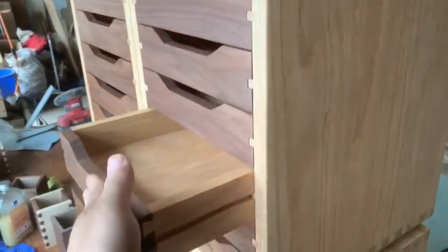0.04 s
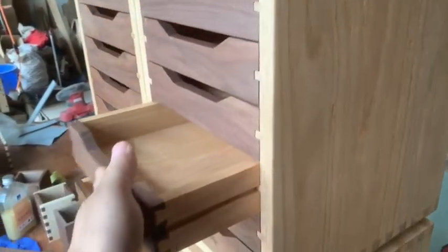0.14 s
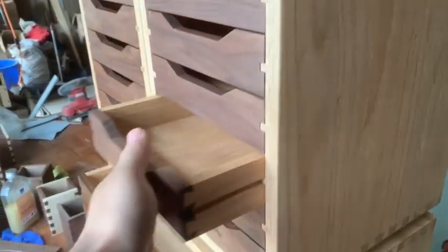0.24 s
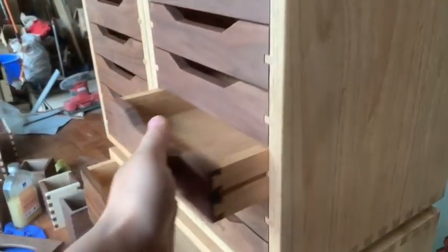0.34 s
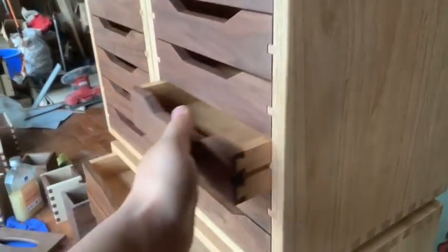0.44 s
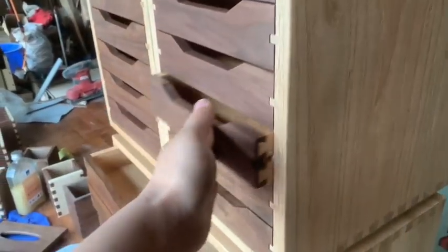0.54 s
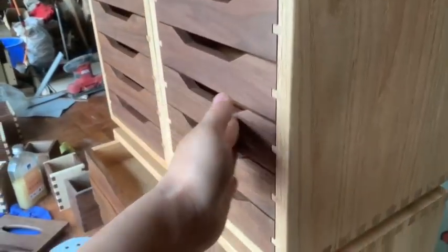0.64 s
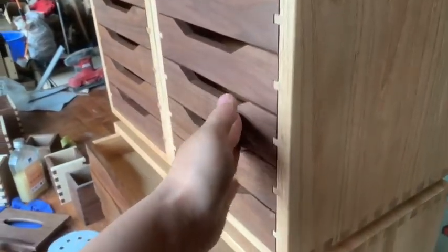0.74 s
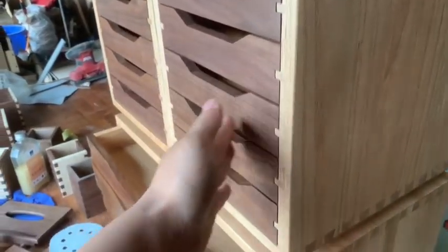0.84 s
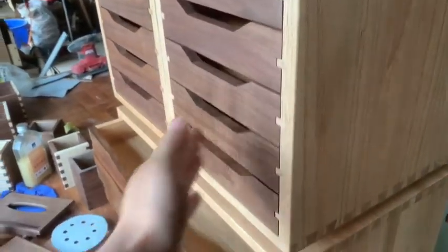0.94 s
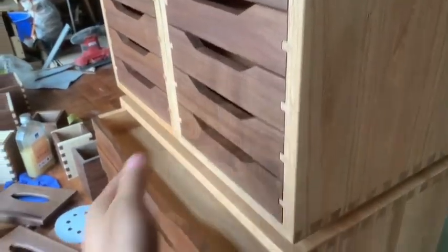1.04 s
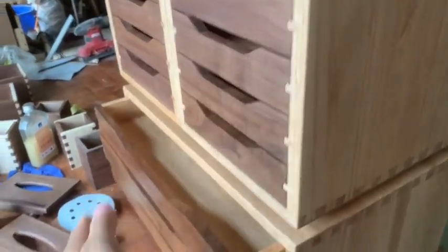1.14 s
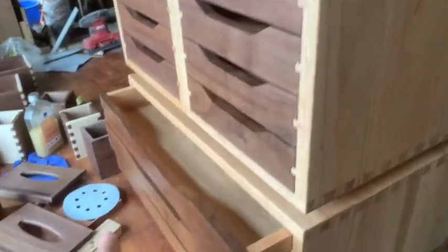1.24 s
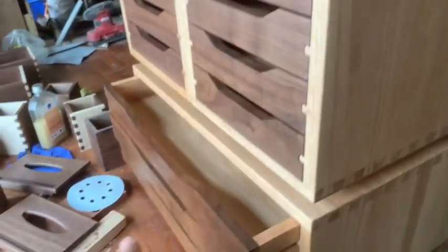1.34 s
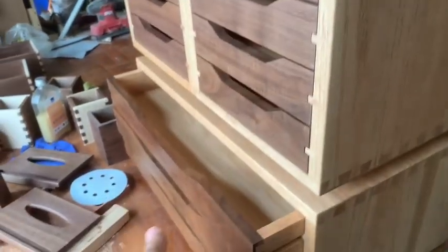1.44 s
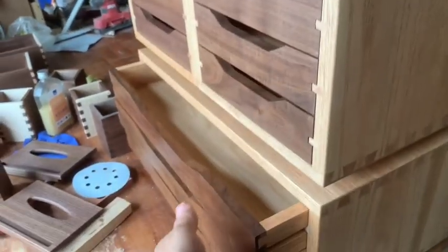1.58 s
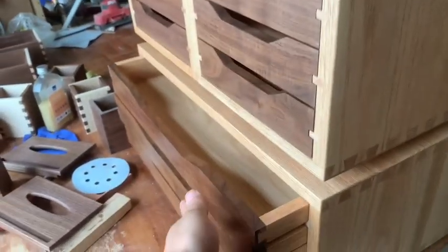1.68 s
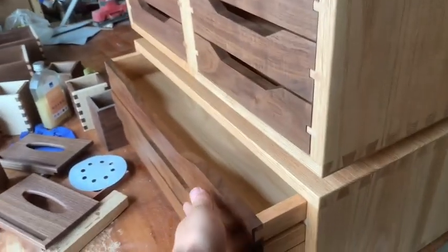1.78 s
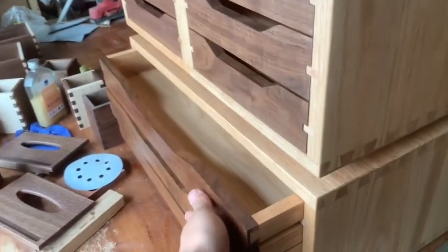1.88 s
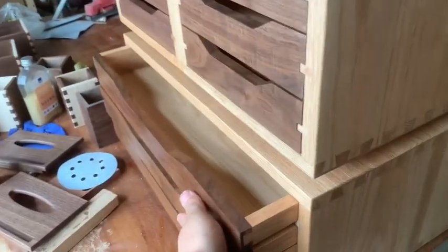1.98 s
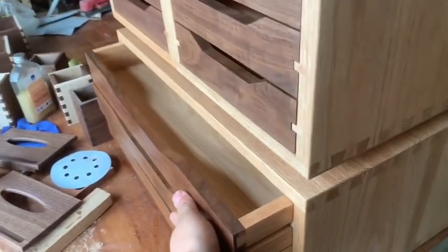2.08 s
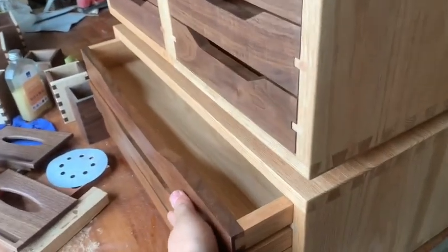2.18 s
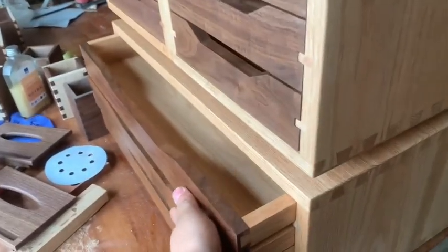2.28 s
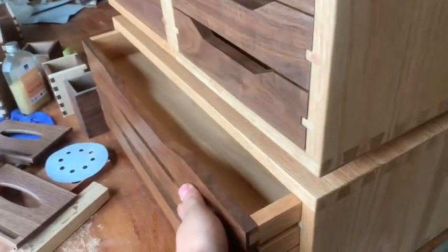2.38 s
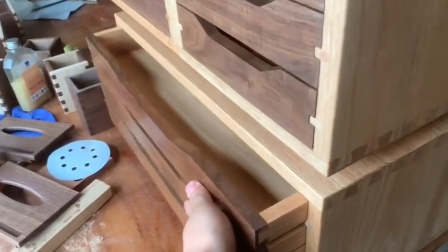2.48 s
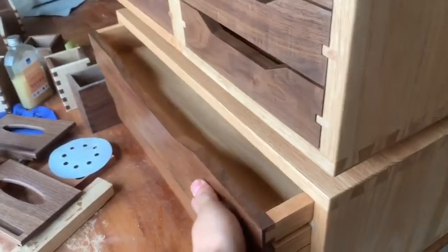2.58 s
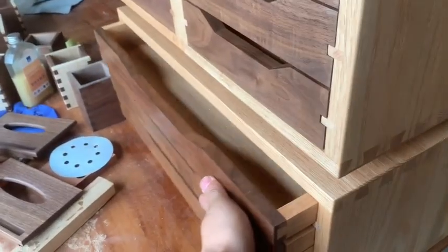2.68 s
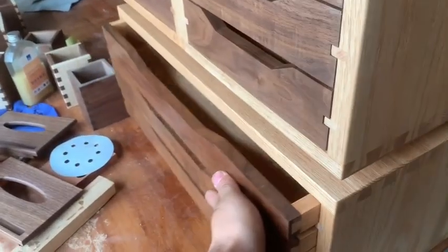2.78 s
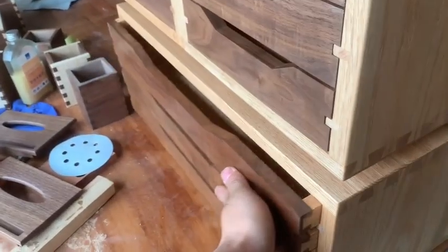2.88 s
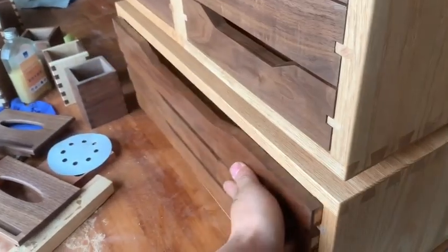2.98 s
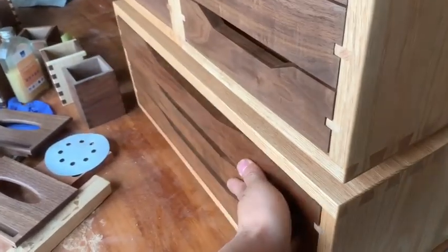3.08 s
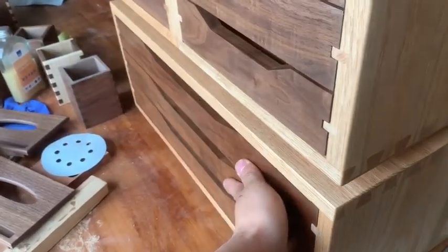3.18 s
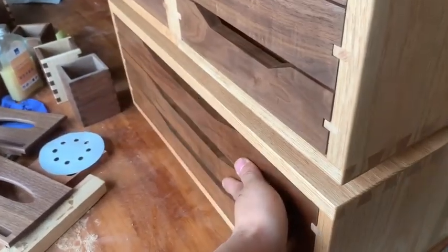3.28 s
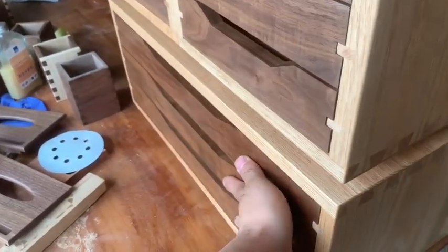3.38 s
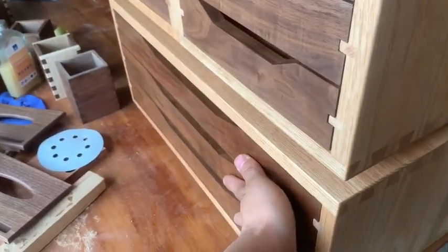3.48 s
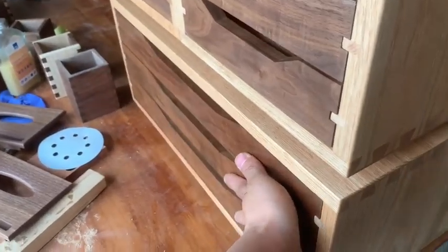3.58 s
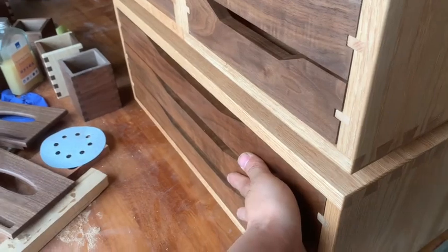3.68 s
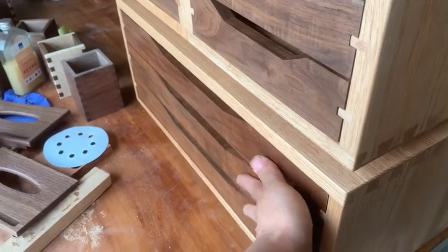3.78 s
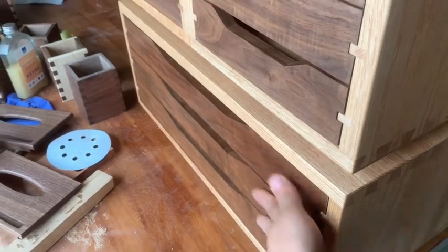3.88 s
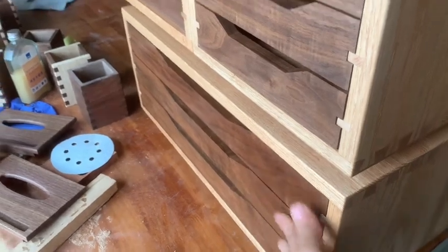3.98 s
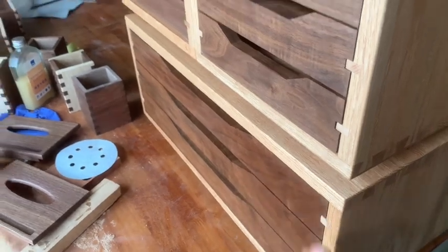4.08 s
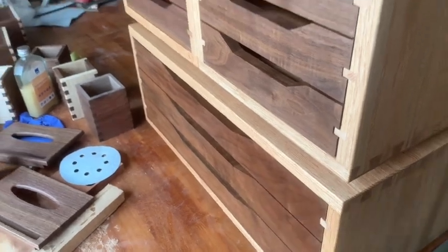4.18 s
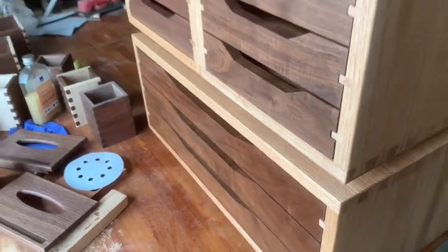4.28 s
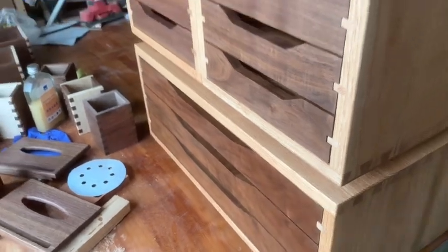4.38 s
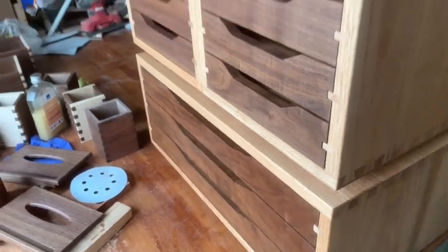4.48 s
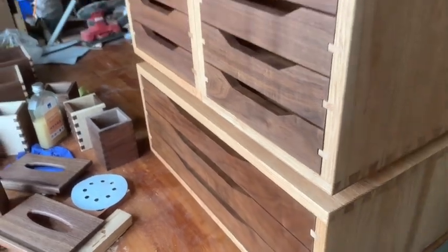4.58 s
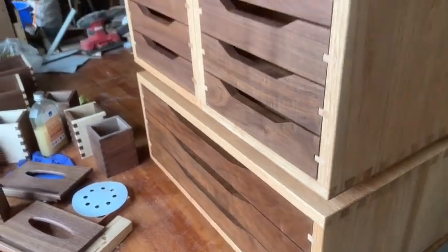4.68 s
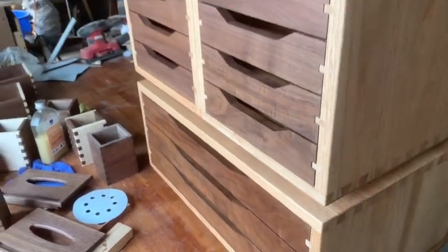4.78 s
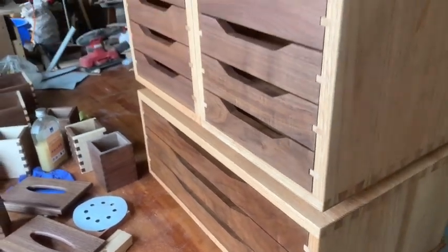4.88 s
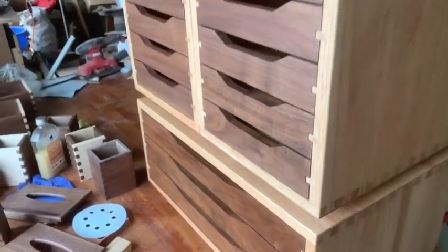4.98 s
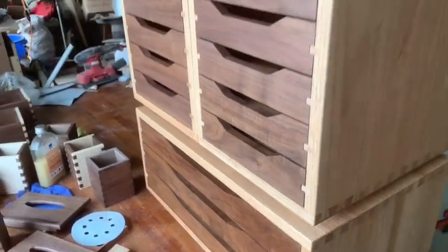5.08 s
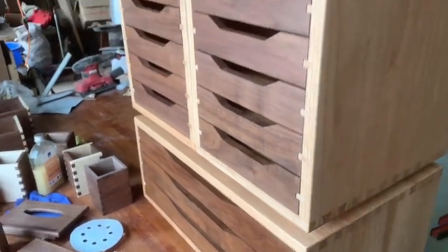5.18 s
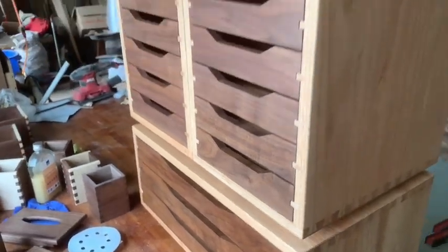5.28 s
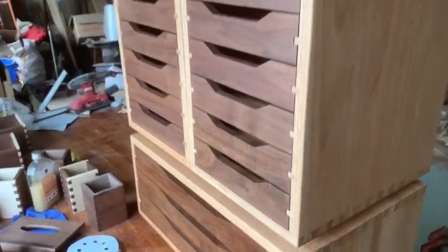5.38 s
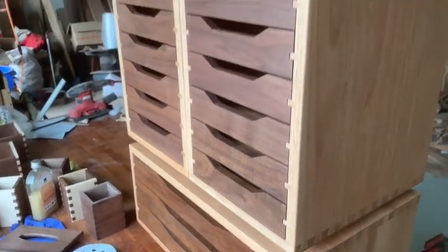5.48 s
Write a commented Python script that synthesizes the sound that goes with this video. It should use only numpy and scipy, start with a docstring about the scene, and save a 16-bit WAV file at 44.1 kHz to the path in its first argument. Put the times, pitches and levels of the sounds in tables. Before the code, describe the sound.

In a small, lightly echoing workshop with a steady low fan-like rush, a small wooden drawer rubs hollowly along its runners and slams home with a loud, short knock. After a pause of faint cloth and grip noises, a wide drawer knocks several times, slides with a woody rasp and rattles into its seat. A soft press and faint finger brushing follow. The close hand-held stereo microphone rumbles gently.

```python
"""Two wooden drawers pushed shut

A small drawer slides in and slams home; a wide one is nudged, knocks, slides, rattles and is pressed flush.
Short knocks ring the wooden modes of each drawer, random tiny slips make the rubbing, and a room echoes both.
Clothes and fingers brush faintly as shaped noise, and the hand-held microphone rumbles and bumps softly.
A fan-like rush of steady noise fills the workshop throughout."""
import sys
import numpy as np
from scipy import signal
from scipy.fft import rfft, irfft
from scipy.io import wavfile

SR = 44100
rng = np.random.default_rng(int(sys.argv[2]) if len(sys.argv) > 2 else 0)


def log_audio(samples):
    """Write samples as a 16-bit WAV file to the path given in sys.argv[1]."""
    # one column per channel
    frames = np.atleast_2d(samples).T
    # limit to full scale, then quantise
    limited = np.clip(frames, -1, 1)
    pcm = np.round(limited * 32767).astype(np.int16)
    wavfile.write(sys.argv[1], SR, pcm)


N = 244314
TIME = np.arange(N) / SR
RING_TIME = TIME[:SR]   # one second, for everything that rings

# Steady rush of the shop. Each row: frequency in Hz, level in dB per Hz.
SHOP = [(20, -86), (65, -68), (140, -82.5), (210, -82.5), (450, -82.5), (700, -89), (830, -96.5),
        (940, -107), (1250, -100), (1850, -97.5), (2300, -102.5), (3000, -108), (4000, -113.5),
        (5000, -122), (9000, -121), (13500, -122), (15500, -135)]
# How alike left and right noise are. Each row: frequency in Hz, likeness from 0 to 1.
LIKENESS = [(120, 0.96), (260, 0.86), (500, 0.34), (1000, 0.033), (2000, 0.46), (4000, 0.063),
            (12000, 0.63)]

# Main tones of each drawer in its case. Each row: frequency in Hz, level in dB, time to fall 60 dB in seconds.
SMALL_MODES = [(166.3, -19.5, 0.27), (166, 0.5, 0.042), (228.4, -4.5, 0.05), (297, -9, 0.043),
               (358, -15, 0.061), (400.5, -18, 0.12), (462, -27.5, 0.3), (617, -22.5, 0.23),
               (744, -12, 0.061), (803, -39, 0.072), (940, -38, 0.018), (1120, -23.5, 0.064),
               (1199, -17, 0.045), (1252.5, -14.5, 0.063), (1264.4, -11.5, 0.045), (1464, -45, 0.029),
               (1835, -38, 0.076), (1845, -21.5, 0.047), (1930, -20, 0.02), (2100, -25, 0.027),
               (2305, -40, 0.064), (2392, -22, 0.021), (2530, -37, 0.04), (3000, -43.5, 0.062),
               (3160, -36, 0.04), (3690, -44, 0.053), (4220, -45.5, 0.048), (4470, -45, 0.05)]
WIDE_MODES = [(103.4, -11.5, 0.12), (134.2, -18.5, 0.43), (162.2, -10, 0.12), (194.6, -14.5, 0.12),
              (231.5, -3.5, 0.056), (262.2, -21.5, 0.27), (302, -6.5, 0.045), (336.4, -14.5, 0.083),
              (374, -12.5, 0.092), (397, -23, 0.1), (437.6, -19.5, 0.1), (520, -15.5, 0.033),
              (628, -29, 0.12), (718, -28, 0.13), (782, -24.5, 0.17), (1000, -41, 0.075),
              (1084, -21, 0.073), (1196, -28.5, 0.071), (1329, -17.5, 0.064), (1556, -34, 0.059),
              (1800, -39.5, 0.04), (2170, -33.5, 0.052), (2527, -32, 0.039), (2700, -39.5, 0.033),
              (2980, -37.5, 0.034), (3450, -45, 0.045), (3870, -45, 0.04), (4200, -47, 0.04),
              (4813, -48, 0.049)]
# The crowd of finer, quickly damped panel tones. Each row: frequency in Hz, level in dB.
PANELS = [(100, -16), (400, -10.5), (700, -10), (920, 18), (1250, 18), (1680, 13), (2050, 11.5),
          (2550, 7.5), (3200, -1), (4000, -7.5), (6000, -13.5), (9000, -3), (15000, -23.5)]
SMALL_PANEL_DB, SMALL_PANEL_T60_S = -5, .085
WIDE_PANEL_DB, WIDE_PANEL_T60_S = -7, .06

# Knocks: an edge ticks and rings the box, more or less by where it lands; the drawer's weight thumps after it.
# The small drawer is taken hold of, catches on its runners, slams home and rebounds.
# The wide one is nudged, knocks along its runners, catches briefly, rattles into its seat, is pressed flush.
# Each row: time in seconds, tick level in dB, tick pitch in Hz, ring of the tick in dB, thump level in dB,
# thump pitch in Hz, pitch of the edge's clack in Hz, clack level in dB over the tick.
SMALL_KNOCKS = [ (.026, -38, 1210, -7, -29.5, 350, 1350, -9), (.402, -51, 900, -4, -38, 200, 1350, -3),
                (.445, -60, 900, -12, -30.5, 198, 1090, -2), (.568, -53, 650, -8, -25, 223, 760, 4.5),
                (.6612, 2.5, 2250, -7.5, 3, 268, 2400, -9), (.6649, -24.5, 753, -0.5, -1.5, 104, 1220, -3),
                (.6705, -22, 3600, -4, -14.5, 330, 4300, -1), (.686, -21, 2400, -1.5, -24, 420, 2330, 9),
                (.732, -21, 3300, -6, -33, 161, 4220, 3)]
WIDE_KNOCKS = [ (2.286, -22, 2780, -3.5, -11, 284, 2400, -2), (2.300, -27, 395, 2, -19, 370, 410, 4.5),
               (2.4252, -10, 4300, 2.5, -34, 223, 2340, 5), (2.432, -15.5, 3870, -6.5, -22, 182, 3000, 5),
               (2.4712, -7, 1480, 1, 0, 335, 2670, 4.5), (2.489, -31.5, 1210, -0.5, -11.5, 332, 1310, 2),
               (2.5205, -18, 3000, 1, -4.5, 198.6, 2670, 0.5), (2.548, -41, 990, -5, -8.5, 183, 620, 2.5),
               (2.652, -53, 890, -14, -26.5, 233, 1090, 0), (2.955, -33.5, 950, 0.5, -25, 318, 1330, -14),
               (3.0622, -23, 710, 2, -37, 194, 1370, -16), (3.070, -28.5, 480, 3, -12, 114.5, 600, 7),
               (3.0928, -17.5, 2270, 2.5, -21, 202, 2630, 8), (3.102, -28, 600, 5, -22, 280, 630, 4),
               (3.108, -33, 1900, 10, -16.5, 208, 1750, 19), (3.1222, -7.5, 1200, -4.5, -19, 188, 1210, -8),
               (3.128, -22, 2900, 5.5, -17.5, 210.5, 3340, 5), (3.1355, -19.5, 930, 1, -28, 310, 686, 4),
               (3.146, -29, 685, 0, -26, 214, 724, 3), (3.162, -31, 800, -3, -44, 400, 630, 3),
               (3.172, -39, 700, -9, -24.5, 134, 630, 0), (3.479, -53, 805, 1, -24, 139, 630, -6)]
TICK_OCTAVES, THUMP_OCTAVES = 1.71, 0.82   # bandwidth of the two parts of a knock
EDGE_WIDTH_HZ = 220   # bandwidth of the clack

# One push slides each drawer home.
# Each row: time in seconds, friction level in dB, resonance of the runner in Hz.
SMALL_SLIDE = [(.05, -23, 395), (.17, -4, 410), (.26, 1.5, 444), (.38, 1, 436), (.49, -1.5, 414),
               (.55, 0.5, 395), (.59, -2.5, 424), (.66, 3.5, 422)]
WIDE_SLIDE = [(2.2, -9, 367), (2.35, -2, 363), (2.62, -1.5, 366), (2.71, -0.5, 387), (2.81, 3.5, 388),
              (2.92, 2, 346), (2.97, 3.5, 383), (3.04, 1.5, 428.6), (3.12, 5.5, 426)]
SMALL_RUNNER_WIDTH_HZ, WIDE_RUNNER_WIDTH_HZ = 20, 30
# Force of the wood grain on the runners. Each row: frequency in Hz, level in dB per Hz before the push.
SMALL_FRICTION = [(60, -114), (140, -111), (205, -99), (330, -100), (450, -107), (750, -109), (900, -96),
                  (1200, -105), (1380, -99), (1780, -108), (2060, -101), (2420, -99), (2900, -103),
                  (3650, -96.5), (4400, -103), (6000, -104), (9000, -109), (15000, -104)]
WIDE_FRICTION = [(60, -100), (160, -102), (260, -106), (370, -103), (700, -100), (950, -100.5),
                 (1300, -106), (2500, -103.5), (4000, -106), (6000, -113), (9000, -112), (15000, -112)]
CATCHES_PER_S, CATCH_SPREAD_DB = 9000, 1.6   # average rate and spread of the slips
JUDDER_HZ, JUDDER_DB = 60, 1.1   # rate and depth of the uneven judder
# Resonances that the rubbing wakes on its way.
# Each row: time of the strongest moment in seconds, length in seconds, frequency in Hz, level in dB.
SMALL_SCRAPES = [(0.193, .16, 420, 13), (0.217, 0.26, 2020, 10), (.26, 0.11, 3860, 13.5),
                 (0.278, 0.11, 870, 5), (0.282, 0.25, 2570, 4), (.33, .12, 3190, 15), (.35, 0.42, 1380, 5),
                 (.44, .14, 1125, 10.5), (.45, 0.2, 2600, 15), (0.578, 0.083, 620, 14),
                 (.6, .18, 3500, 12.5), (.62, .14, 2290, 11)]
WIDE_SCRAPES = [(2.72, 0.17, 2430, 5.1), (2.8, .14, 1140, 3.1), (2.87, .16, 1325, 11), (2.96, .12, 2600, 2),
                (3.04, 0.14, 1830, 9.5)]
SCRAPE_WIDTH_HZ, SCRAPE_SAG_PER_S = 50, .15   # the sag is a share of the pitch

# Echo of the room. Each row: frequency in Hz, level in dB.
ROOM = [(80, -3.5), (160, -13.5), (400, -1.5), (650, -3.5), (1000, -6.5), (1800, -6), (2600, -7),
        (3700, -1.5), (9000, -2.5)]
# How long the echo lasts. Each row: frequency in Hz, time to fall 60 dB in seconds.
ROOM_T60 = [(100, 0.84), (300, 0.33), (700, 0.3), (2000, 0.51), (4000, 0.49), (9000, 0.12)]

# The microphone rumbles while it is moved. Each row: start in seconds, end in seconds, level in dB.
HANDLING = [(.7, 1.27, -3.5), (2.1, 5.45, -2.5)]
# Colour of that rumble. Each row: frequency in Hz, level in dB per Hz before the swell.
HANDLING_COLOUR = [(20, -92), (65, -74.5), (155, -67.5), (230, -90), (500, -105), (1500, -140)]
# Clothes rustle as the arm moves. Each row: start in seconds, end in seconds, level in dB.
CLOTH = [(1.0, 1.225, -2), (1.29, 1.36, -5.5), (1.83, 2.02, -3.5)]
# Colour of the rustle. Each row: frequency in Hz, level in dB per Hz before the swell.
CLOTH_COLOUR = [(1500, -125), (4000, -106), (5000, -113), (6300, -108), (10000, -115), (13000, -102),
                (15500, -107)]
# Soft low bumps from the palm and the grip on the microphone.
# Each row: start in seconds, level in dB, pitch in Hz.
BUMPS = [(1.047, -32.5, 70.7), (1.133, -34.5, 77), (1.243, -35, 92), (3.483, -34.5, 101), (3.534, -41, 84),
         (4.281, -43.5, 62), (4.369, -37, 103), (5.265, -35, 67), (5.371, -34, 83)]
BUMP_CYCLES = 2.9   # rough length of a bump, in cycles of its pitch
# Fingers brush the drawer front. Each row: start in seconds, end in seconds, level in dB.
FINGERS = [(3.67, 4.045, -1.1)]
# Colour of the brushing. Each row: frequency in Hz, level in dB per Hz before the swell.
FINGERS_COLOUR = [(1500, -120), (4000, -112), (6000, -118), (9000, -108), (12000, -117), (15000, -128)]

# Treble colour of the two microphone ports. Each row: frequency in Hz, level in dB.
LEFT_PORT = [(6600, 1.5), (7100, -8), (7750, -5.5), (8100, 7.5), (9500, -3.5)]
RIGHT_PORT = [(6600, 1.5), (7100, -22), (7800, -5), (8100, 19), (8900, 8), (10500, 1), (12500, 0.5)]
CUTOFF_HZ = 15700   # the microphone lets nothing much higher through
TINY = 1e-18   # keeps filters from slowing down on vanishingly small numbers


def amp(db):
    """Turn decibels into gain."""
    return 10 ** (np.asarray(db) / 20)


def at_hz(points, hz):
    """Read a table between its rows, along a log-frequency axis."""
    f, value = np.transpose(points)
    return np.interp(np.log(np.maximum(hz, 1)), np.log(f), value)


def bins(x):
    """List the frequencies of a signal's spectrum."""
    return np.fft.rfftfreq(x.shape[-1], 1 / SR)


def colour(x, spectrum):
    """Make some frequencies louder or softer, by a table of Hz and dB."""
    return irfft(rfft(x) * amp(at_hz(spectrum, bins(x))), x.shape[-1])


def convolve(x, response):
    """Let every instant of a signal set off its own copy of a response."""
    return signal.fftconvolve(np.atleast_2d(x), response, axes=-1)[:, :N]


def diffuse(size):
    """White stereo noise whose two sides are as alike at each frequency as LIKENESS says."""
    white = rng.standard_normal((2, size))
    mid, side = rfft(white)
    alike = np.clip(at_hz(LIKENESS, bins(white)), 0, .999)
    shared = np.sqrt((1 + alike) / 2) * mid
    opposed = np.sqrt((1 - alike) / 2) * side * [[1], [-1]]
    return irfft(shared + opposed, size)


def hiss(spectrum):
    """Steady stereo noise with a given dB per Hz."""
    return colour(diffuse(N), spectrum) * np.sqrt(SR / 2)


def shop_rush():
    """The fan-like rush is steady noise, strongest in the bass."""
    return hiss(SHOP)


def decay(t60):
    """A fade that loses 60 dB in t60 seconds."""
    return np.exp(-np.log(1000) * RING_TIME / t60)


def dying_noise(spectrum, t60s, build_s):
    """Countless tones ringing at once sound like noise; each octave fades at its own pace."""
    noise = rfft(colour(diffuse(SR), spectrum))
    out = 0
    centres = np.geomspace(62.5, 16000, 9)
    for hz, own in zip(centres, np.eye(len(centres))):
        share = at_hz(np.c_[centres, own], bins(RING_TIME))
        band = irfft(noise * share, SR)
        envelope = decay(at_hz(t60s, hz)) * (1 - np.exp(-RING_TIME / build_s))
        out = out + band * envelope / np.linalg.norm(envelope)
    return out


def drawer(modes, panel_db, panel_t60, lean_db, travel_s, radiate_hz, give_s):
    """Two stereo responses of a drawer: its main tones, and the crack of its panels, carried through the case."""
    ring = 0
    for k, (hz, db, t60) in enumerate(modes):
        # low tones move the whole box together; higher neighbours swing against each other
        sign = 1 if hz < 560 else (-1) ** k
        ring = ring + sign * amp(db) * decay(t60) * np.sin(2 * np.pi * hz * RING_TIME)
    ring = ring * (1 - np.exp(-RING_TIME / give_s))   # the wood gives a little before it rings
    ring = ring * amp([[-lean_db], [lean_db]])   # left, right
    crack = dying_noise(PANELS, [(500, panel_t60), (8000, .7 * panel_t60)], build_s=.001)
    response = np.array([ring, amp(panel_db) * crack])
    f = bins(RING_TIME)
    # bending waves are slower the lower they are, so the crack leads the thump; travel_s holds at 1 kHz
    bending = np.exp(-4j * np.pi * travel_s * np.sqrt(1000 * f))
    # a small box hardly radiates the deepest bass
    radiation = 1j * f / (1j * f + radiate_hz)
    return irfft(rfft(response) * bending * radiation, SR)


def contact(s, db, hz, octaves):
    """One brief touch of wood on wood: a click kept to a band of pitches around hz."""
    low_hz = hz / 2 ** (octaves / 2)
    high_hz = min(hz * 2 ** (octaves / 2), CUTOFF_HZ)
    pulse = signal.unit_impulse(SR // 10)
    for edge_hz, kind in ((low_hz, "high"), (high_hz, "low")):
        band_edge = signal.butter(2, edge_hz, kind, fs=SR, output="sos")
        pulse = signal.sosfilt(band_edge, pulse + TINY)
    return np.pad(amp(db) * pulse, (round(s * SR), N))[:N]


def knocks(rows, lag_cycles):
    """Force on main tones and panels: a tick with its edge's clack, then a thump that lags more when deeper."""
    on_modes, on_panels = np.zeros((2, N))
    for s, tick_db, tick_hz, ring_db, thump_db, thump_hz, clack_hz, clack_db in rows:
        tick = contact(s, tick_db, tick_hz, TICK_OCTAVES)
        b, a = signal.iirpeak(clack_hz, clack_hz / EDGE_WIDTH_HZ, fs=SR)
        clack = signal.lfilter(b, a, tick + TINY)
        tick = tick + amp(clack_db) * clack
        thump = contact(s + lag_cycles / thump_hz, thump_db, thump_hz, THUMP_OCTAVES)
        on_modes += amp(ring_db) * tick + thump
        on_panels += tick + thump
    return on_modes, on_panels


def push(rows, release_s):
    """Gain of a push, which starts from rest and dies away at the stop, and the pitch of the runner."""
    s, db, hz = np.transpose(rows)
    outside_s = np.abs(TIME - np.clip(TIME, s[0], s[-1]))
    effort = amp(np.interp(TIME, s, db)) * np.exp(-outside_s / release_s)
    return effort, np.interp(TIME, s, hz)


def unevenness(rate_hz):
    """A random line that heads for a new value rate_hz times a second."""
    steps = rng.standard_normal(2000)
    return np.interp(TIME * rate_hz, np.arange(len(steps)), steps)


def slide(effort, friction):
    """Wood fibres catch and let go: tiny slips of uneven size, stronger and weaker as the drawer judders."""
    sizes = amp(CATCH_SPREAD_DB * np.minimum(rng.exponential(1, N), 4))
    happens = rng.random(N) < CATCHES_PER_S / SR
    judder = amp(JUDDER_DB * unevenness(JUDDER_HZ))
    slips = sizes * happens * judder * diffuse(N)
    return effort * colour(slips / slips.std(), friction) * np.sqrt(SR / 2)


def excite(responses, blows, rub, rub_modes_db, rub_panels_db):
    """Blows ring the whole drawer; rubbing travels along the runners, so panel tones blur into a broad rasp."""
    modes, panels = responses
    on_modes, on_panels = blows
    ringing = convolve(on_modes + amp(rub_modes_db) * rub, modes)
    crack = convolve(on_panels, panels)
    rasp = amp(rub_panels_db) * colour(rub, PANELS)
    return ringing + crack + rasp


def runner(rub, hz, width_hz, level_db):
    """A hollow resonance under the rubbing, able to shift in pitch as the drawer goes deeper into its case."""
    turn = np.exp(2j * np.pi * np.cumsum(hz) / SR)
    r = np.exp(-np.pi * width_hz / SR)
    # shift the moving pitch down to 0 Hz, smooth there, and shift it back up
    smooth = signal.lfilter([1 - r], [1, -r], rub.mean(axis=0) / turn + TINY)
    return amp(level_db) * np.real(turn * smooth)


def scrapes(rub, rows):
    """As the contact travels, resonances of the drawer's side swell, sag a little in pitch and fade."""
    rasp, out = colour(rub, PANELS), 0
    for s, length_s, hz, db in rows:
        from_peak_s = TIME - s
        nearness = np.exp(-(2 * from_peak_s / length_s) ** 2)
        sagging_hz = hz * np.exp(-SCRAPE_SAG_PER_S * from_peak_s)
        out = out + nearness * runner(rasp, sagging_hz, SCRAPE_WIDTH_HZ, db)
    return out


def small_drawer():
    """The small drawer is rubbed along its runners and slams home, which rings its wood."""
    responses = drawer(SMALL_MODES, SMALL_PANEL_DB, SMALL_PANEL_T60_S, lean_db=0.94,
                       travel_s=0.001842, radiate_hz=78.5, give_s=0.0011)
    blows = knocks(SMALL_KNOCKS, lag_cycles=0.05)
    effort, runner_hz = push(SMALL_SLIDE, release_s=0.0091)
    rub = slide(effort, SMALL_FRICTION)
    wood = excite(responses, blows, rub, rub_modes_db=-6, rub_panels_db=-6)
    hollow = runner(rub, runner_hz, SMALL_RUNNER_WIDTH_HZ, level_db=46)
    return wood + scrapes(rub, SMALL_SCRAPES) + hollow


def room_echo(wood):
    """The room answers the wood with a brief wash of echoes."""
    return convolve(wood, dying_noise(ROOM, ROOM_T60, build_s=0.00048))


def swell(rows, attack_share, release_s):
    """Gain of hand movements: each gathers speed over a share of its length, holds, and dies away."""
    gain = np.zeros(N)
    for start, end, db in rows:
        age = np.maximum(TIME - start, 0)
        attack = np.sin(np.pi / 2 * np.minimum(age / (attack_share * (end - start)), 1)) ** 2
        release = np.exp(-np.maximum(TIME - end, 0) / release_s)
        gain += amp(db) * attack * release
    return gain


def handling():
    """Moving the hand-held microphone makes a low rumble of noise."""
    return swell(HANDLING, attack_share=0.12, release_s=0.095) * hiss(HANDLING_COLOUR)


def cloth_rustle():
    """Clothes rub as the arm moves, heard as swelling high noise."""
    return swell(CLOTH, attack_share=0.65, release_s=0.048) * hiss(CLOTH_COLOUR)


def bumps():
    """A padded push swells and fades within a few low cycles."""
    out = np.zeros(N)
    for s, db, hz in BUMPS:
        cycles = hz * np.maximum(TIME - s, 0)
        phase = 2 * cycles / BUMP_CYCLES   # strongest at 1
        out += amp(db) * phase ** 2 * np.exp(1 - phase ** 2) * np.sin(2 * np.pi * cycles)
    return out


def wide_drawer():
    """The wide drawer knocks and rubs along its runners and rattles into its seat, which rings its wood."""
    responses = drawer(WIDE_MODES, WIDE_PANEL_DB, WIDE_PANEL_T60_S, lean_db=0.17,
                       travel_s=0.001826, radiate_hz=67.7, give_s=0.0013)
    blows = knocks(WIDE_KNOCKS, lag_cycles=0.827)
    effort, runner_hz = push(WIDE_SLIDE, release_s=0.021)
    rub = slide(effort, WIDE_FRICTION)
    wood = excite(responses, blows, rub, rub_modes_db=-11, rub_panels_db=-7)
    hollow = runner(rub, runner_hz, WIDE_RUNNER_WIDTH_HZ, level_db=41)
    return wood + scrapes(rub, WIDE_SCRAPES) + hollow


def finger_brush():
    """Skin brushing over the drawer front makes a faint high noise."""
    return swell(FINGERS, attack_share=0.26, release_s=0.054) * hiss(FINGERS_COLOUR)


def scene():
    """Add up the two drawers, their echo, the grip, clothes, fingers and the shop."""
    wood = small_drawer() + wide_drawer()
    grip = handling() + bumps()
    return shop_rush() + wood + room_echo(wood) + grip + cloth_rustle() + finger_brush()


def record(dry):
    """The microphone ports colour the treble, the highest peaks are rounded, the top is cut."""
    heard = np.array([colour(dry[0], LEFT_PORT), colour(dry[1], RIGHT_PORT)])
    rounded = heard / (1 + heard ** 8) ** (1 / 8)
    top_cut = signal.ellip(10, .1, 80, CUTOFF_HZ, fs=SR, output="sos")
    return signal.sosfilt(top_cut, rounded)


dry = scene()
out = record(dry)
log_audio(out)
```